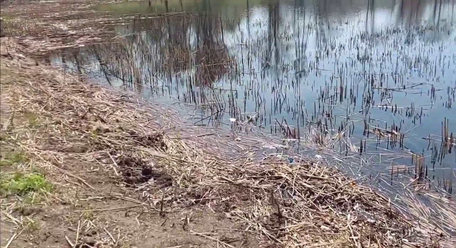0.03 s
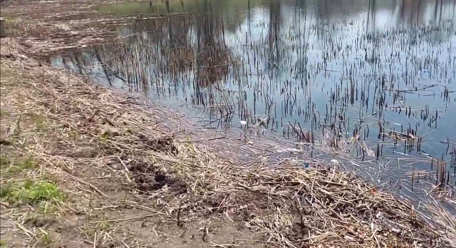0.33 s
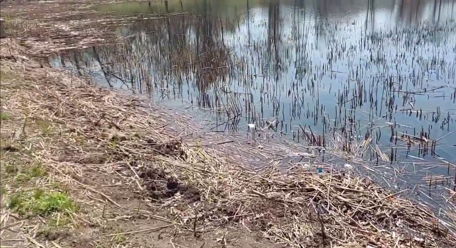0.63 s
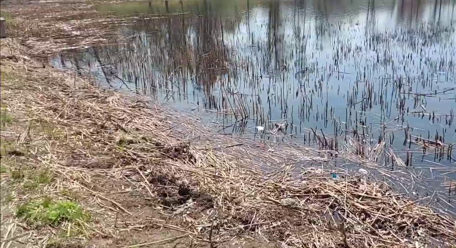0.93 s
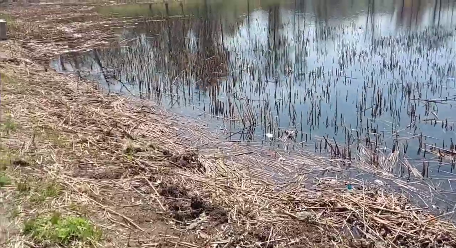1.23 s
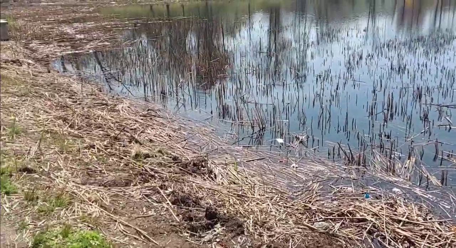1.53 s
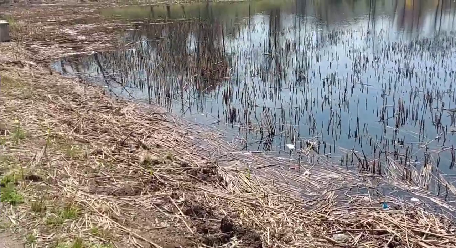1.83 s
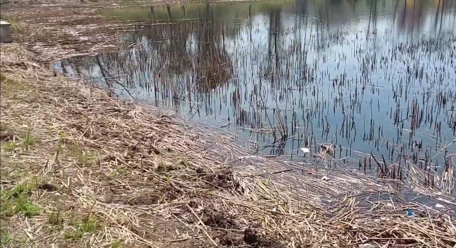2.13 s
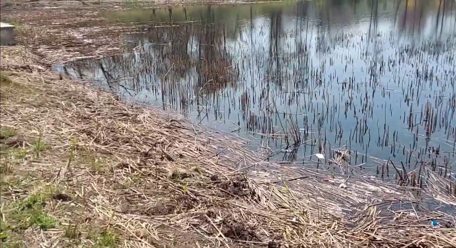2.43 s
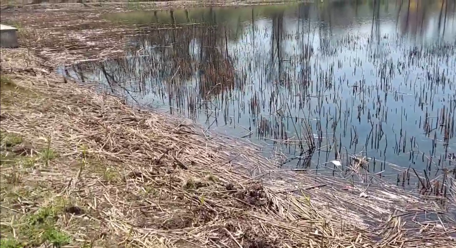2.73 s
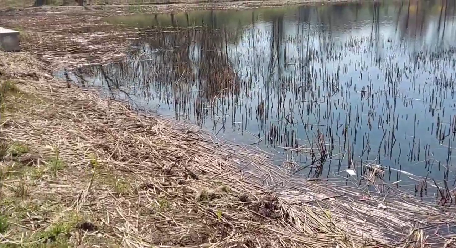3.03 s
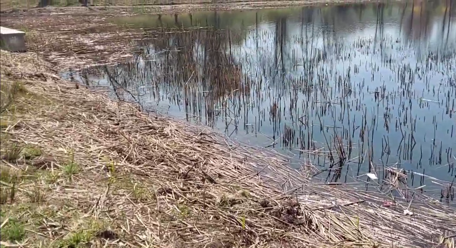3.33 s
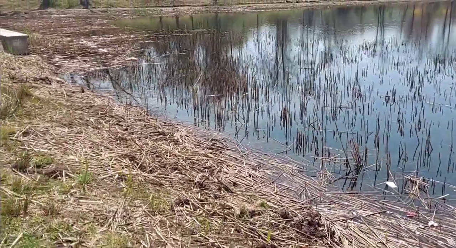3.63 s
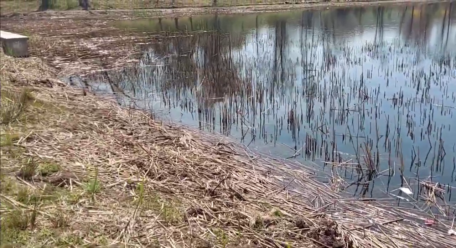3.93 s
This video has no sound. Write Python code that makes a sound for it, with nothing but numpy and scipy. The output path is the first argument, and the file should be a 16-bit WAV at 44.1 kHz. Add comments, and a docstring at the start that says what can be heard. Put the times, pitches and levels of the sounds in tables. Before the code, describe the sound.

Slow footsteps swish and crunch through dry reeds at a pond edge, snapping stems. Small birds chirp far off over a low engine drone, then two marsh birds sing gurgled notes and buzzy trills, one after the other.

```python
"""A distant engine drones under light outdoor air, and small birds chirp far off across a pond.
Someone walks slowly over dry reeds: straw swishes, clumps crunch underfoot and stems snap.
Then two marsh birds, probably blackbirds, sing gurgled notes and a buzzy trill each, the second
taking over from the first. The calls are gliding, fluttering tones that echo off trees and banks;
the steps are shaped bursts of noise."""
import sys
import numpy as np
from scipy import signal
from scipy.fft import rfft, irfft, next_fast_len
from scipy.io import wavfile
from scipy.ndimage import map_coordinates

SR = 44100
rng = np.random.default_rng(int(sys.argv[2]) if len(sys.argv) > 2 else 0)


def store_wav(level_fs):
    """Save 16-bit WAV to argv[1]."""
    pcm = np.round(np.clip(np.atleast_2d(level_fs), -1, 1) * 32767)
    wavfile.write(sys.argv[1], SR, pcm.T.astype(np.int16))


N = 176400
T = np.arange(N) / SR


def amp(db):
    """Decibels to gain."""
    return 10 ** (np.asarray(db) / 20)


def unit(x):
    """Scale to rms 1."""
    return x / np.sqrt(np.mean(x ** 2) + 1e-20)


def along(points, hz):
    """Read a curve of (Hz, value) points on a log frequency axis."""
    freqs, values = np.transpose(points)
    return np.interp(np.log(hz + 1), np.log(freqs + 1), values)


def fader(points):
    """A gain that rides through (seconds, dB) points."""
    return amp(np.interp(T, *np.transpose(points)))


def filtered(x, response):
    """Pass x through a frequency response."""
    n = x.shape[-1]
    padded = next_fast_len(n + 8192)
    return irfft(rfft(x, padded) * response(np.fft.rfftfreq(padded, 1 / SR)), padded)[..., :n]


def eq(x, curve):
    """Colour x with a curve of (Hz, dB) points and scale it to rms 1."""
    return unit(filtered(x, lambda hz: amp(along(curve, hz))))


def wobble(rate, t=T):
    """A smooth random curve, rate knots a second."""
    return map_coordinates(rng.standard_normal(8192), [t * rate + 2], mode="wrap")


def tone(hz):
    """A sine that follows a pitch curve."""
    return np.sin(2 * np.pi * np.cumsum(hz) / SR)


def pan(db):
    """Stereo gains for a left-minus-right level: negative sits to the right."""
    gains = amp([[db / 2], [-db / 2]])
    return gains / gains.mean()


def noise(alike, size=N):
    """White stereo noise, from wide (alike 0) to nearly mono (close to 1)."""
    mid, side = rng.standard_normal((2, size))
    side *= np.sqrt((1 - alike) / (1 + alike))
    return np.array([mid + side, mid - side])


def add(out, start, x):
    """Mix x into out at start seconds."""
    part = out[..., round(start * SR):][..., :x.shape[-1]]
    part += x[..., :part.shape[-1]]


def arch(u):
    """A rounded envelope over u = 0..1."""
    edges = np.clip(np.minimum(u, 1 - u) * 10, 0, 1)
    return np.sqrt(np.abs(np.sin(np.pi * np.clip(u, 0, 1)))) * edges


def gate(start, end, attack, release):
    """Smooth attack, hold and release, in seconds."""
    ramp = np.minimum((T - start) / attack, (end - T) / release) + .5
    return np.sin(np.pi / 2 * np.clip(ramp, 0, 1)) ** 2


def lead(x, seconds):
    """Make the left channel arrive early; negative favours the right."""
    return filtered(x, lambda hz: np.exp(1j * np.pi * hz * seconds * np.array([[1], [-1]])))


# The engine's fader. Each row: time in seconds, level in dB.
ENGINE_LEVEL = [(0.0, -53), (0.05, -51), (0.11, -37), (0.47, -46.5), (0.8, -38.5), (0.85, -67),
                (0.88, -42.5), (1.07, -40.5), (1.12, -51), (1.18, -45), (2.27, -42), (2.31, -51),
                (2.42, -41.5), (3.05, -47), (3.07, -43), (3.55, -50), (3.72, -43), (4.0, -45)]
# Its harmonics. Each row: multiple of the pitch, relative level in dB.
ENGINE_HARMONICS = [(1, 0), (2, -9.5)]
def engine(pitch_hz=52.98, wander_hz=2.61):
    """A distant engine drones, wavering in pitch and level."""
    hz = pitch_hz + wander_hz * wobble(14)
    drone = sum(amp(db + .84 * wobble(18)) * np.sqrt(2) * tone(k * hz) for k, db in ENGINE_HARMONICS)
    return pan(-7) * fader(ENGINE_LEVEL) * drone


# Faders for rumble and hum. Each row: time in seconds, level in dB before any trim.
RUMBLE_LEVEL = [(0.0, -51.5), (0.22, -43), (0.29, -44.5), (0.39, -40.5), (0.42, -45.5), (2.13, -44.5),
                (2.15, -53), (2.18, -40), (2.26, -47.5), (2.64, -42.5), (2.66, -44.5), (3.05, -47),
                (3.93, -43), (4.0, -43)]
HUM_LEVEL = [(0.0, -56), (0.12, -67), (0.97, -62), (1.34, -45.5), (1.37, -60), (1.48, -44.5), (1.87, -61.5),
             (2.47, -52.5), (3.05, -69), (4.0, -51.5)]
# The rumble's colour. Each row: frequency in Hz, relative level in dB.
RUMBLE_EQ = [(20, -24), (38, -11.5), (60, 3.5), (80, 3.5), (112, -3.5), (145, -9), (175, -10), (200, -10),
             (235, -16.5), (310, -23), (450, -31), (900, -55), (3000, -100)]
def rumble_and_hum(hum_hz=196.1, hum_trim_db=-3):
    """A nearly mono rumble, with a low hum that comes and goes."""
    hum = fader(HUM_LEVEL) * amp(hum_trim_db + .76 * wobble(16)) * tone(hum_hz + 9 * wobble(30))
    rumble = fader(RUMBLE_LEVEL) * eq(noise(alike=.84), RUMBLE_EQ)
    return pan(-3) * (rumble + hum)


# The air's fader. Each row: time in seconds, level in dB before the trim.
AIR_LEVEL = [(0.0, -72.5), (0.5, -67), (0.93, -70.5), (1.29, -66.5), (1.61, -69), (4.0, -66.5)]
# Its colour. Each row: frequency in Hz, relative level in dB.
AIR_EQ = [(100, -5), (400, 1.5), (800, 6.5), (1300, -1.5), (2200, -7), (4500, -13.5), (6200, -15),
          (8000, -10.5), (10500, -16.5), (13000, -14.5), (16000, -18)]
def air(trim_db=2):
    """Open air: a wide, soft bed of noise."""
    return pan(-2.5) * amp(trim_db) * fader(AIR_LEVEL) * eq(noise(alike=.0093), AIR_EQ)


def whistles(rows, rasp_hz=450, flutter_per_s=750):
    """Gliding pure notes; rasp is a fast flutter of the pitch."""
    out = np.zeros(N)
    for start, length, first, middle, last, db, rasp in rows:
        t = np.arange(int(length * SR)) / SR
        glide = np.polyval(np.polyfit([0, .5, 1], [first, middle, last], 2), t / length)
        flutter = rasp * rasp_hz * wobble(flutter_per_s, t)
        add(out, start, amp(db) * np.sqrt(2) * arch(t / length) * tone(glide + flutter))
    return out


def through_reeds(x, t60_s=.03, wet_db=-4):
    """Many short paths between the stems blur a far call."""
    t = np.arange(SR // 10) / SR
    paths = rng.standard_normal(len(t)) * amp(-60 * t / t60_s)
    blur = signal.fftconvolve(x, paths / np.linalg.norm(paths))[:N]
    return (x + amp(wet_db) * blur) / np.hypot(1, amp(wet_db))


# The pond's reverb. Each row: frequency in Hz, seconds to fade by 60 dB.
ECHO_DECAY = [(300, 0.091), (3000, 0.81), (8000, 0.27)]
def outdoors(x, wet_db, pan_db):
    """A distant voice: direct sound plus scatter from trees and banks."""
    hz, t, bands = signal.stft(rng.standard_normal((2, SR // 2)), SR, nperseg=256)
    decay = amp(-60 * t / along(ECHO_DECAY, hz)[:, None])
    tail = signal.istft(bands * decay, SR, nperseg=256)[1]
    echo = signal.fftconvolve(x[None], tail / np.linalg.norm(tail[0]), axes=1)[:, :N]
    return pan(pan_db) * (x + amp(wet_db) * echo) / np.hypot(1, amp(wet_db))


# Far chirps. Each row: start and length in seconds, first, middle and last pitch in Hz,
# level in dB before the trim, rasp from 0 to 1.
CHIRPS = [(.055, 0.026, 5100, 4730, 4020, -81, 0.3), (.37, 0.034, 3020, 3210, 3300, -73, .1),
          (.765, 0.11, 2850, 3200, 3200, -76, 0.18), (.995, 0.044, 5270, 4830, 4400, -76, 0.3),
          (1.025, .045, 3140, 2960, 2820, -65.5, 0.26), (1.143, .014, 5030, 4800, 4800, -62, .2),
          (1.393, 0.039, 3850, 4230, 5400, -69, .2), (1.632, .052, 3900, 4170, 5080, -69.5, 0.14),
          (1.675, 0.033, 4700, 4400, 4170, -73, 0.54), (1.7, 0.028, 3210, 3400, 3400, -72, 0.4),
          (1.733, 0.033, 5500, 4830, 4340, -72, 0.07), (1.78, .06, 3480, 4200, 4440, -72, 0.2),
          (1.815, 0.023, 4840, 5070, 4700, -76, 0.4), (1.815, 0.049, 3480, 3110, 3170, -68, 0.3),
          (1.893, .05, 5200, 4300, 3850, -75, .2), (2.143, 0.071, 4900, 4020, 3450, -74, 0.18),
          (2.51, 0.054, 5300, 4700, 4350, -73, 0.5), (2.57, 0.04, 3950, 4180, 4200, -66.5, 0.27)]
def chirps(trim_db=.5):
    """Small birds whistle through the reeds, far off to the right."""
    return outdoors(amp(trim_db) * through_reeds(whistles(CHIRPS)), wet_db=-1.5, pan_db=-12)


# Strides. Each row: start and end in seconds, level in dB before the swell.
STRIDES = [(0.25, 0.318, -72.5), (0.303, 0.43, -68.5), (0.437, 0.71, -73.5), (.66, 0.809, -67.5),
           (0.976, 1.14, -73.5), (1.093, 1.226, -61.5), (1.177, 1.413, -64.5), (1.363, 1.604, -77.5),
           (1.91, 2.227, -67), (2.577, 2.744, -68), (2.688, 2.982, -65), (3.19, 3.42, -85),
           (3.43, 3.632, -67.5), (3.634, 3.967, -70.5)]
# The colour of the rustle as heard, with the microphone's peaks near 8 and 13 kHz.
# Each row: frequency in Hz, relative level in dB.
RUSTLE_EQ = [(300, -23), (800, 0.5), (2000, 4), (3300, 1.5), (5000, -0.5), (6200, -3), (7700, -0.5),
             (9000, -3.5), (10700, -14.5), (13000, -6), (16000, -21)]
def swishes(swell_db=5, cracks_per_s=310, crackle_db=-9):
    """Every stride brushes the straw: a grainy hiss with tiny stem cracks, swelling mid-stride."""
    power = np.zeros(N)
    for start, end, db in STRIDES:
        from_middle = 2 * (T - start) / (end - start) - 1
        swell = swell_db * (1 - np.minimum(from_middle ** 2, 2))
        power += (amp(db + swell) * gate(start, end, attack=.015, release=.12)) ** 2
    grain = amp(wobble(700) + 3.4 * wobble(25.04))
    brush = unit(eq(noise(alike=.13), RUSTLE_EQ) * grain)
    sizes = amp(2 * np.minimum(rng.exponential(size=N), 4))
    cracks = (rng.random(N) < cracks_per_s / SR) * sizes * noise(alike=.3)
    return pan(2) * np.sqrt(power) * unit(brush + amp(crackle_db) * eq(cracks, RUSTLE_EQ))


# Crunches underfoot. Each row: start and length in seconds, level in dB, centre in Hz.
CRUNCHES = [(0.314, 0.023, -62, 1720), (0.358, 0.014, -62, 1900), (0.381, 0.01, -73, 1700),
            (1.11, .009, -58.5, 2000), (1.12, 0.03, -58, 2210), (1.157, 0.0062, -50, 2600),
            (1.164, 0.0032, -52.5, 1490), (1.404, .011, -61.5, 950), (1.273, .012, -68, 4170),
            (1.927, 0.024, -56.5, 1750), (2.666, 0.0032, -47, 1560), (2.973, 0.0088, -58.5, 1290),
            (3.513, 0.0061, -47.5, 1650), (2.18, .006, -56, 3020), (3.551, 0.0086, -54.5, 2550),
            (3.754, 0.0029, -50.5, 3330)]
def crunches(grain_db=5, log_width=.33, skirt_db=-17):
    """A foot crushes a clump of stems: dull cracks, one resonance over a broad skirt of rustle."""
    out, t = np.zeros((2, N)), np.arange(SR // 10) / SR
    for start, length, db, centre_hz in CRUNCHES:
        def colour(hz):
            ring = np.exp(-(np.log((hz + 1) / centre_hz) / log_width) ** 2 / 2)
            return ring + amp(skirt_db + along(RUSTLE_EQ, hz))
        cracks = noise(alike=.33, size=len(t)) * amp(grain_db * wobble(796, t)) * arch(t / length)
        add(out, start, amp(db) * unit(filtered(cracks, colour)) * np.sqrt(length / t[-1]))
    return pan(-1) * out


# Snapping stems. Each row: start in seconds, level in dB before the trim, low, mid and high EQ in dB.
SNAPS = [(0.32, -43.5, -9, -16, -14), (0.364, -43.5, -16, -14, -20), (0.572, -42.5, -15, -12, -14),
         (1.115, -45, -14, -14, -6), (2.179, -46, -25, -11, -10), (2.404, -40, -25, -21, -9.5),
         (2.714, -27, -13, -8.5, -17.5), (2.862, -36.5, -29, -9, -15), (2.923, -41, -22, -6, -10),
         (2.939, -32, -27, -11, -14.5), (3.216, -44, -19, -14, -12), (3.348, -39.5, -11.5, -24, -8),
         (3.402, -41.5, -24, -10, -3), (3.419, -33, -36, -6, -14.5), (3.515, -31, -22.5, -23, -34.5)]
def snaps(attack_s=.00048, t60_s=.0081, trim_db=-9.5):
    """Dry stems crack, each a tiny noise burst with its own colour."""
    out, t = np.zeros((2, N)), np.arange(SR // 20) / SR
    envelope = amp(-60 * t / t60_s) * (1 - np.exp(-t / attack_s)) ** 2
    for start, db, low, mid, high in SNAPS:
        colour = [(300, low - 8), (1400, low), (3600, mid - 6),
                  (8000, high - 5), (11000, high - 12), (15000, high - 11)]
        crack = eq(noise(alike=.36, size=len(t)), colour)
        add(out, start, amp(db + trim_db) * crack * envelope / envelope.max())
    return pan(1) * out


# One squeak in two parts. Each row: start and length in seconds, first, middle and last pitch in Hz,
# level in dB, rasp from 0 to 1.
SQUEAK = [(1.11, 0.0127, 3540, 3380, 3180, -60, .4), (1.12, 0.01, 3150, 3060, 3050, -49.5, 0.2)]
def squeak():
    """A short falling squeak as the foot comes down."""
    return pan(-13) * whistles(SQUEAK)


# The stalk's resonances. Each row: frequency in Hz, relative level in dB, seconds to fade by 60 dB.
STALK_MODES = [(2520, 4.5, 0.0072), (2980, 0.5, 0.0057), (7300, 1, 0.0022), (6520, -2.5, 0.0027),
               (13000, -18, 0.0014)]
def stalk(start_s=1.2922, level_db=-25, attack_s=.00043):
    """A thick hollow stalk breaks with one ringing tick."""
    out, t = np.zeros(N), np.arange(SR // 20) / SR
    ring = sum(amp(db - 60 * t / t60) * np.sin(2 * np.pi * hz * t) for hz, db, t60 in STALK_MODES)
    add(out, start_s, amp(level_db) * ring * (1 - np.exp(-t / attack_s)))
    return pan(-4) * out


# Buzzy notes. Each row: start and length in seconds, first and last pitch in Hz, level in dB,
# shakes per second, pitch swing in Hz.
BUZZES = [(1.431, 0.072, 3345, 3140, -64, 170, 151), (1.412, 0.106, 2077, 2095, -67, 170, 180),
          (2.602, 0.04, 1506, 1540, -59, 90, 60), (2.719, 0.051, 2240, 2334, -53.5, 150, 278),
          (2.735, 0.08, 3270, 3510, -57.5, 250, 261), (2.733, 0.057, 7150, 7400, -68, 280, 377),
          (2.814, .036, 3400, 4110, -49, 310, 480), (2.836, 0.023, 4350, 4980, -56, 310, 480)]
def buzzes(unevenness=.13, grain_db=2.5):
    """Hoarse bird notes: the pitch shakes fast about its glide while the level flickers at random."""
    out = np.zeros(N)
    for start, length, from_hz, to_hz, db, rate, swing_hz in BUZZES:
        t = np.arange(int(length * SR)) / SR
        glide = from_hz + (to_hz - from_hz) * t / length
        shake = tone(rate * (1 + unevenness * wobble(206, t))) + .5 * wobble(750, t)
        voice = amp(grain_db * wobble(407, t)) * tone(glide + swing_hz * shake)
        add(out, start, amp(db) * arch(t / length) * unit(voice))
    return out


def high_hiss(peak_s=2.42, spread_s=.11, centre_hz=12700, width_hz=730, level_db=-71.5):
    """A thin, very high band of noise swells and fades once."""
    hiss = filtered(noise(alike=.089), lambda hz: np.exp(-((hz - centre_hz) / width_hz) ** 2 / 2))
    swell = np.exp(-((T - peak_s) / spread_s) ** 2 / 2)
    return pan(-6) * amp(level_db) * swell * unit(hiss)


# Song notes. Each row: start and length in seconds, first, middle and last pitch in Hz,
# level in dB, rasp from 0 to 1.
SONG_NOTES = [(2.43, .12, 1062, 1111, 1015, -64.5, 0.16), (2.796, .01, 5280, 5270, 5400, -51.5, .15),
              (3.02, 0.093, 1597, 1654, 1800, -66, 0.25), (3.07, 0.06, 1950, 1972, 2034, -56, 0.05),
              (3.16, 0.069, 2000, 1964, 1960, -74, 0.33), (3.275, 0.035, 1086, 1150, 1190, -63, 0.35),
              (3.33, 0.021, 1417, 1472, 1610, -55, 0.13), (3.435, 0.048, 2230, 2060, 2180, -61, 0.45),
              (3.5, 0.029, 1525, 1660, 1880, -59.5, 0.23), (3.15, 0.19, 7200, 7100, 7100, -83, 0.05),
              (3.785, 0.016, 5700, 6100, 7100, -64, 0.6), (3.8, 0.083, 7100, 7145, 7340, -55.5, 0)]
# The reedy note's overtones. Each row: multiple of the pitch, relative level in dB.
REEDY_OVERTONES = [(3, 5), (4, -0.5), (5, -1), (6, -1), (7, -3)]
def gurgles(reedy_start_s=2.598, reedy_length_s=.032, reedy_hz=1025, reedy_db=-67.5):
    """The marsh birds whistle short notes around their trills, one of them reedy with overtones."""
    reedy = [(reedy_start_s, reedy_length_s, *[k * reedy_hz] * 3, reedy_db + db, .2)
             for k, db in REEDY_OVERTONES]
    return whistles(SONG_NOTES) + whistles(reedy)


# One trill per bird. Each row: start and end in seconds, first and last syllables per second,
# level in dB, pitch factor, pan in dB.
TRILLS = [(2.8422, 3.593, 54.9, 51.6, -57, 0.99, -4), (3.571, 4.043, 74.4, 72.2, -59, 0.99, -5)]
# Each bird's syllable, a chain of quick strokes. Each row: start and length in cycles,
# first and last pitch in Hz before the pitch factor, relative level in dB.
SYLLABLES = [
    [(0, 0.23, 5325, 4600, 1.5), (.06, .2, 4510, 2891, 2), (.2, .32, 3730, 3620, -1),
     (.33, .14, 4980, 4910, -3), (.48, .17, 3690, 2674, -1.5), (.66, 0.2, 3157, 2913, -1.5)],
    [(0, .22, 5300, 3440, 3), (.14, .22, 5000, 4900, -16), (.3, .24, 4116, 2838, -3),
     (.53, 0.166, 3715, 3620, -2), (.65, .2, 2750, 3400, -3)],
]
# Each bird's throat. Each row: frequency in Hz, relative level in dB.
THROAT_EQS = [
    [(2000, -1), (2700, 5.5), (3100, 0), (3700, -3), (4400, 2.5), (5000, -0.5), (5300, -2), (5700, -12)],
    [(2000, -2), (2700, -2), (3100, -3), (3750, 0), (4400, -4), (4950, 1.5), (5250, 4), (5700, -14)],
]
def trills(scatter_db=.5, slip_cycles=.012, rasp=.05):
    """Each bird repeats its raspy syllable 50 to 75 times a second, slipping a little in time."""
    out = np.zeros((2, N))
    for trill, syllable, throat in zip(TRILLS, SYLLABLES, THROAT_EQS):
        start, end, first_rate, last_rate, db, pitch, pan_db = trill
        cycles = np.cumsum(np.interp(T, [start, end], [first_rate, last_rate])) / SR
        cycles += slip_cycles * wobble(60) - np.interp(start, T, cycles)
        voice = np.zeros(N)
        for at, length, from_hz, to_hz, stroke_db in syllable:
            progress = np.clip((cycles - at) % 1 / length, 0, 1)
            hz = pitch * from_hz * (to_hz / from_hz) ** progress * (1 + rasp * wobble(700))
            voice += amp(stroke_db + scatter_db * wobble(60)) * arch(progress) * tone(hz)
        voice = unit(through_reeds(eq(voice, throat)))
        envelope = amp(db) * gate(start, end, attack=.015, release=.05)
        out += outdoors(envelope * voice, wet_db=-.5, pan_db=pan_db)
    return out


def scene():
    """Mix the background bed, the birds and the footsteps."""
    bed = engine() + rumble_and_hum() + air()
    birds = chirps() + outdoors(buzzes() + gurgles(), wet_db=-2, pan_db=-5) + trills()
    steps = swishes() + lead(crunches() + snaps() + stalk(), seconds=.0001) + squeak()
    return bed + lead(birds, seconds=-.000029) + steps + high_hiss()


# The left microphone's lead in the bass. Each row: frequency in Hz, phase lead in radians.
MIC_PHASE = [(30, 0.8), (55, 1), (95, 0.3), (170, 0.16), (300, 0.19)]
def record(dry, top_hz=16200):
    """The two microphones differ in phase, most in the bass; nothing is kept above the band limit."""
    sides = np.array([[1], [-1]])
    return filtered(dry, lambda hz: np.exp(.5j * along(MIC_PHASE, hz) * sides) * (hz < top_hz))


dry = scene()
out = record(dry)
store_wav(out)
```